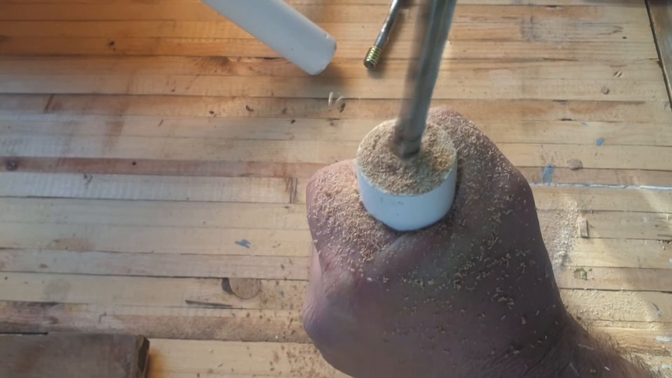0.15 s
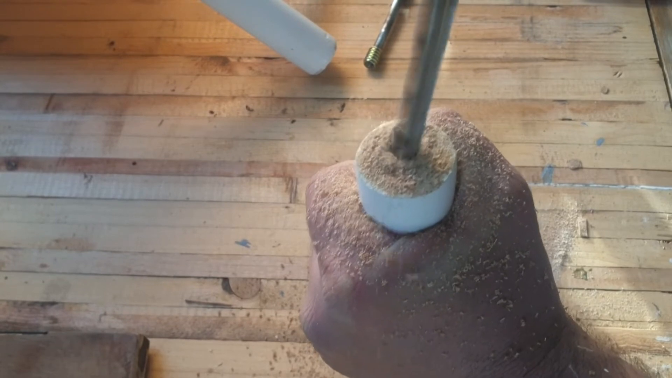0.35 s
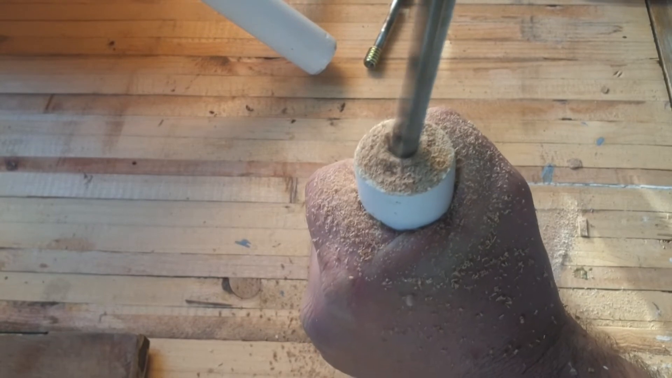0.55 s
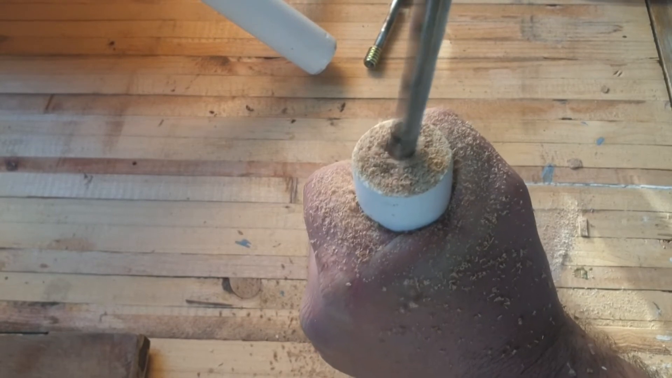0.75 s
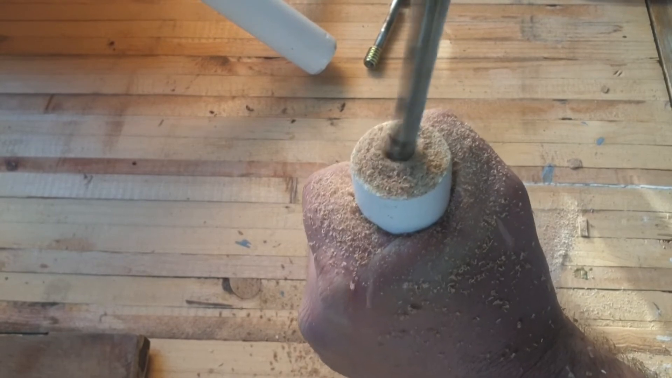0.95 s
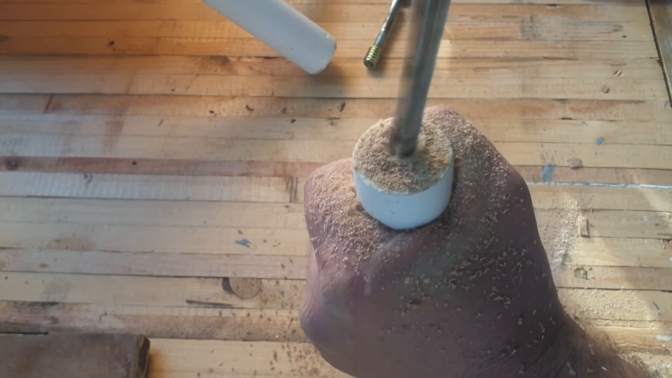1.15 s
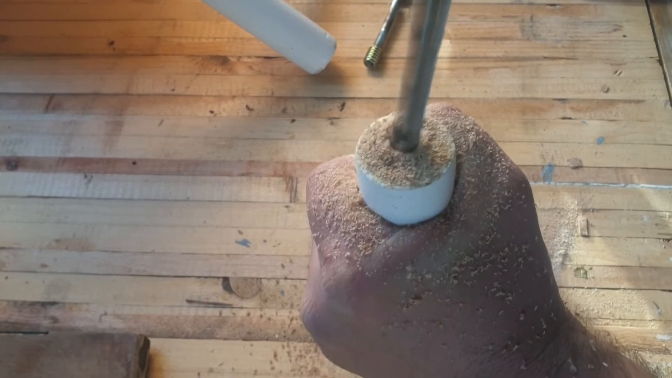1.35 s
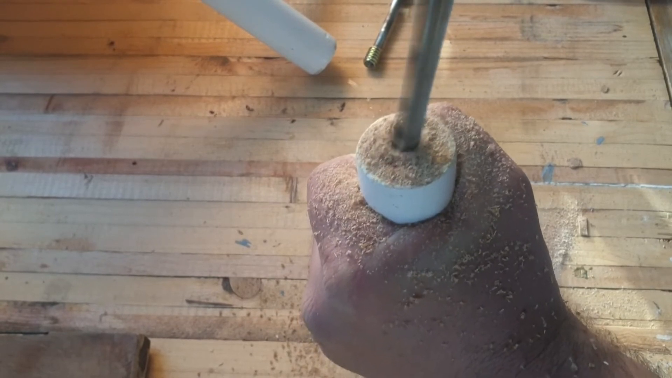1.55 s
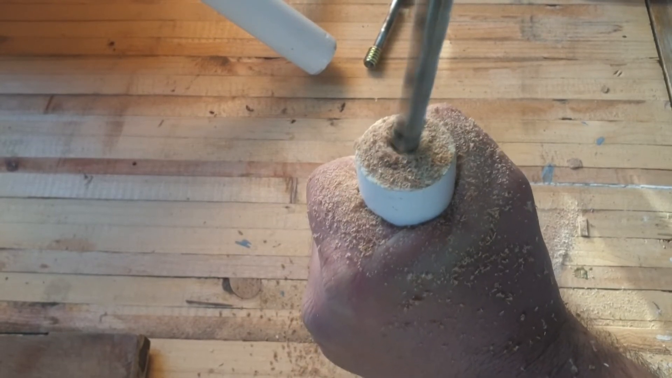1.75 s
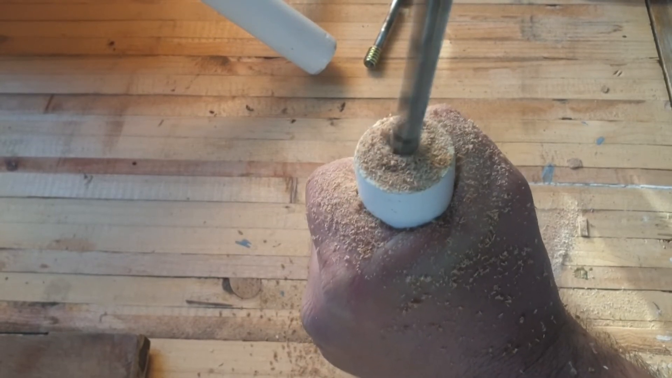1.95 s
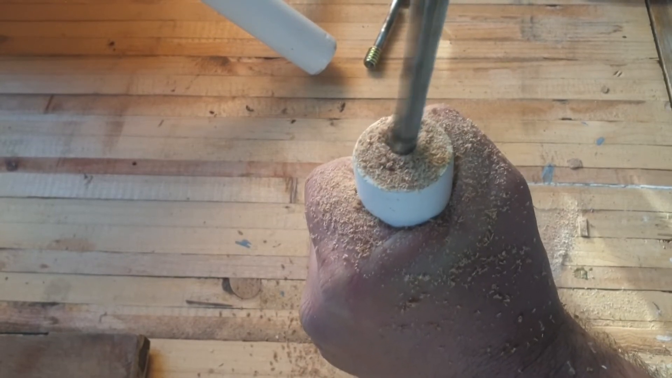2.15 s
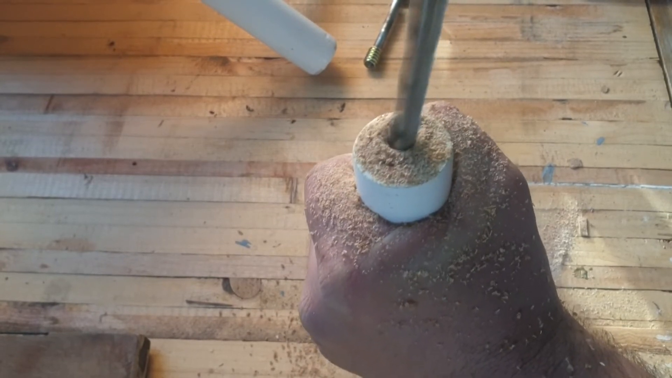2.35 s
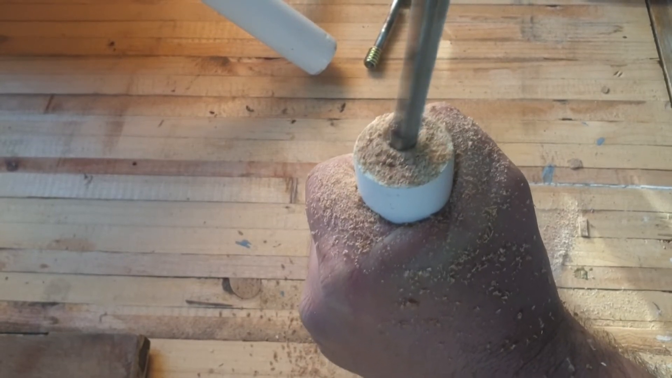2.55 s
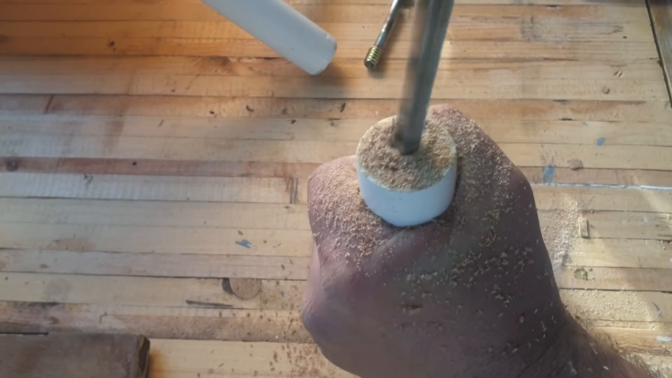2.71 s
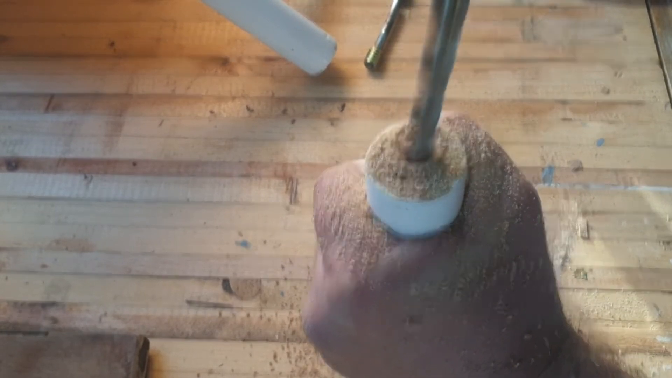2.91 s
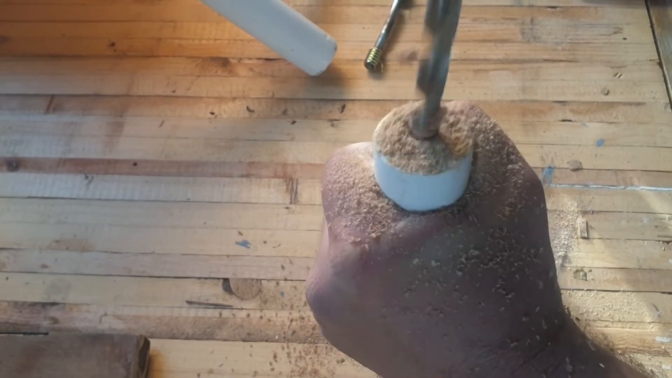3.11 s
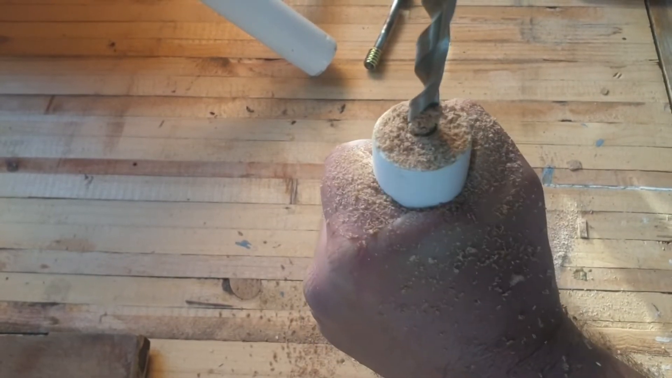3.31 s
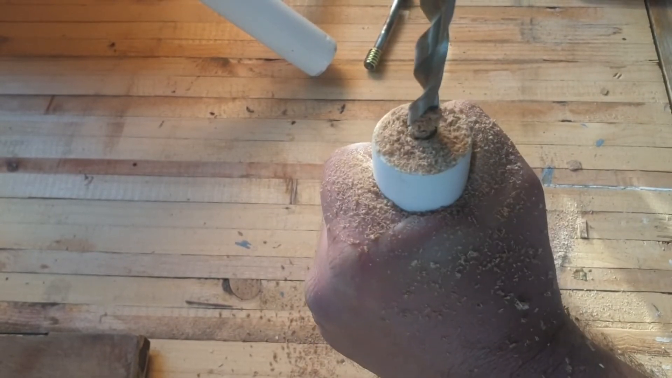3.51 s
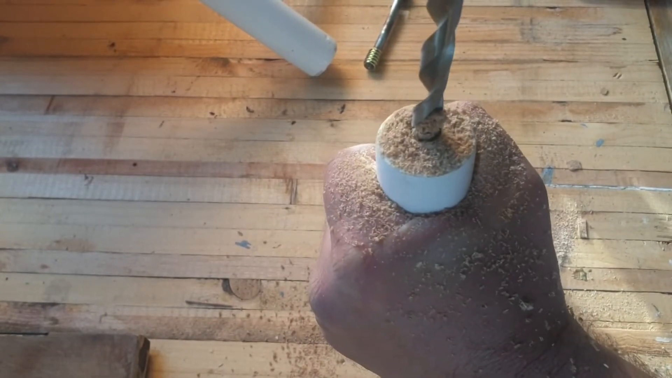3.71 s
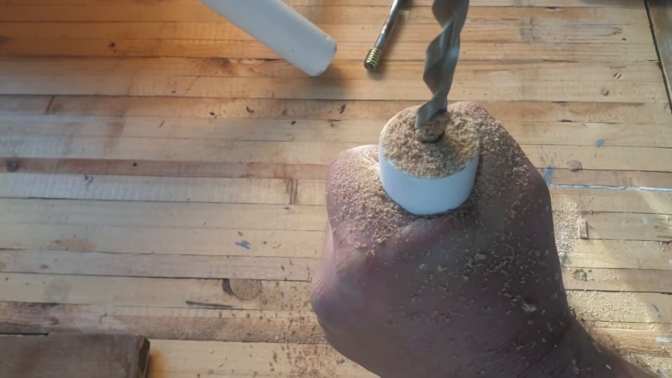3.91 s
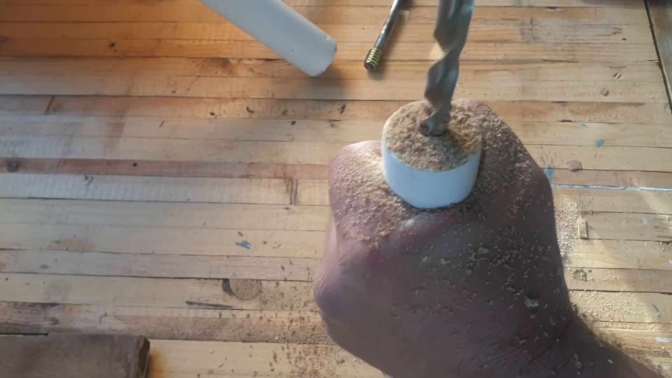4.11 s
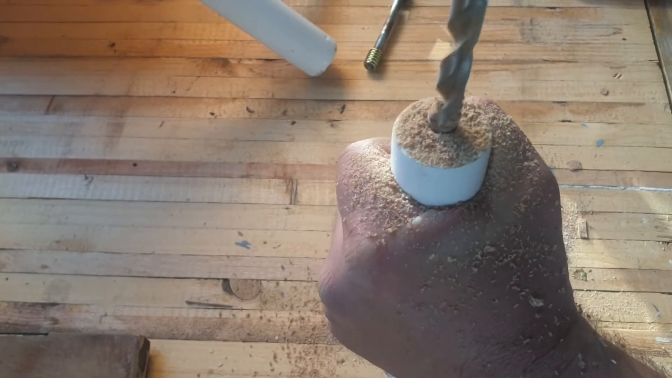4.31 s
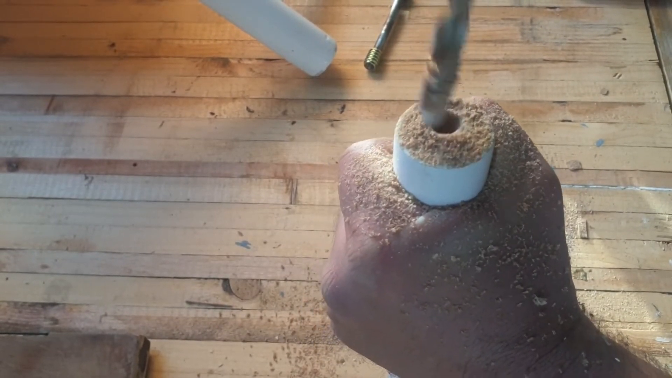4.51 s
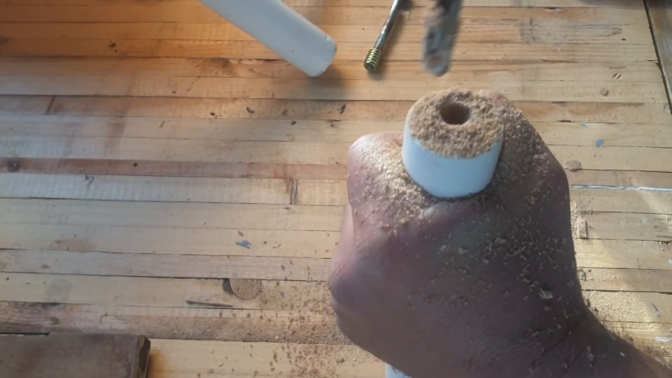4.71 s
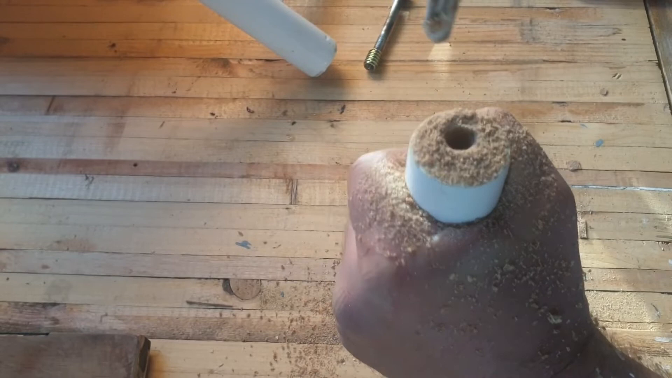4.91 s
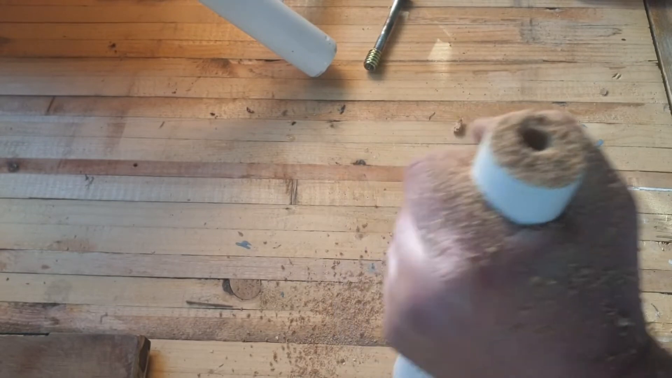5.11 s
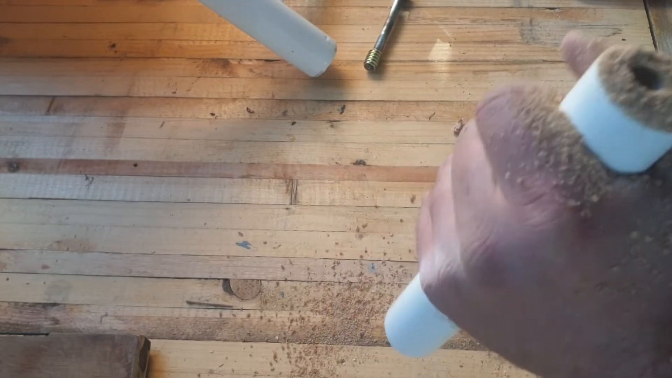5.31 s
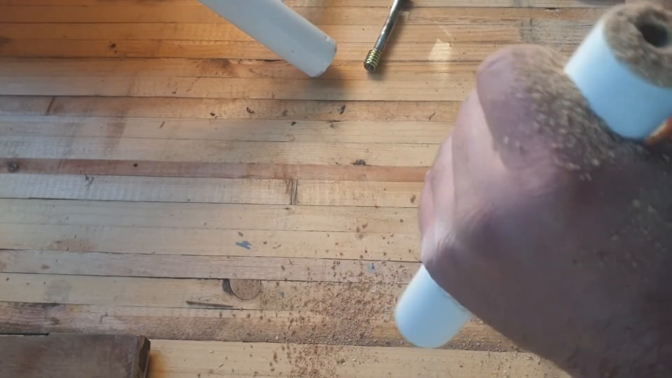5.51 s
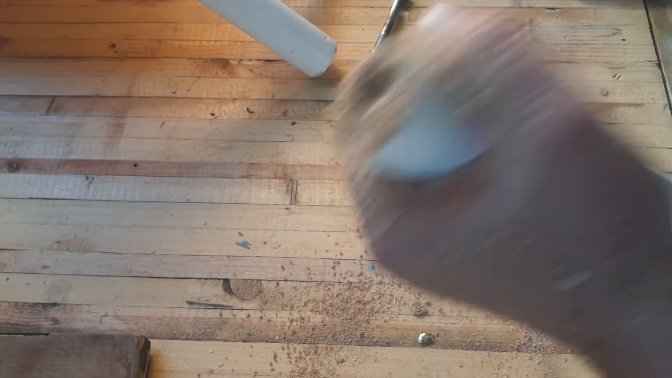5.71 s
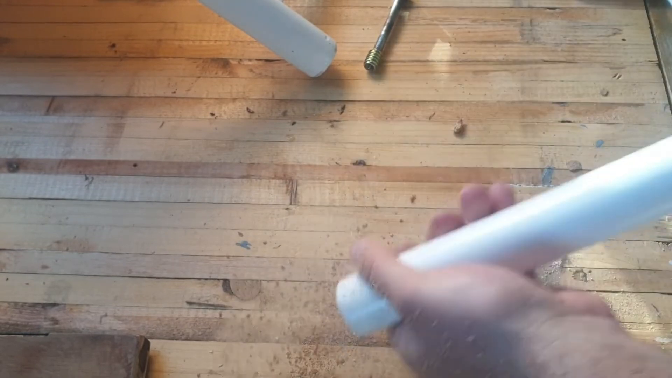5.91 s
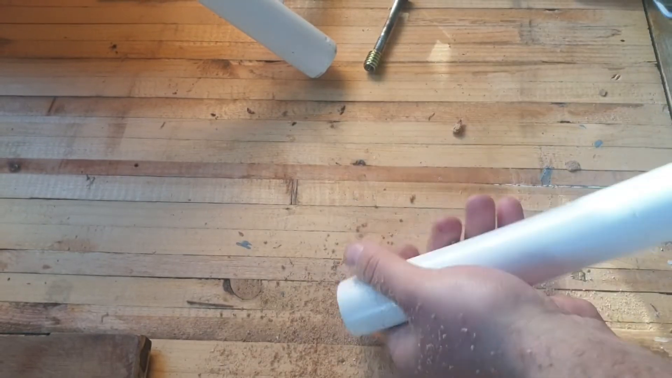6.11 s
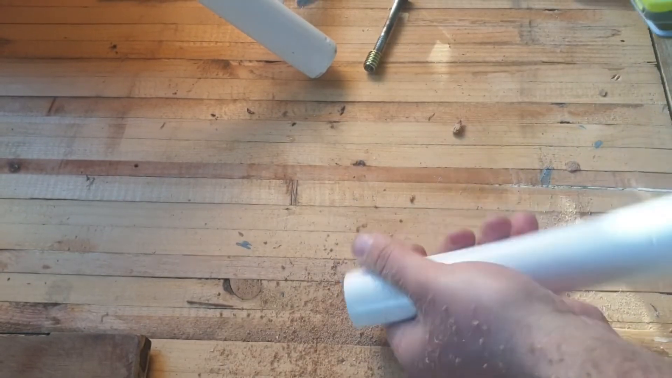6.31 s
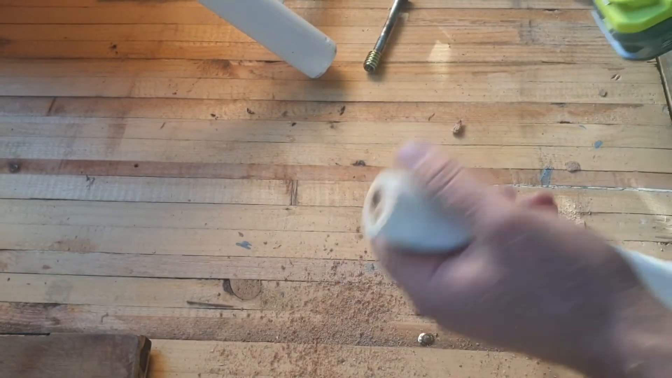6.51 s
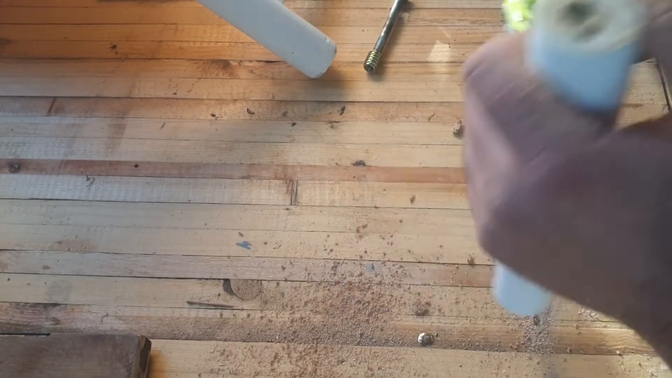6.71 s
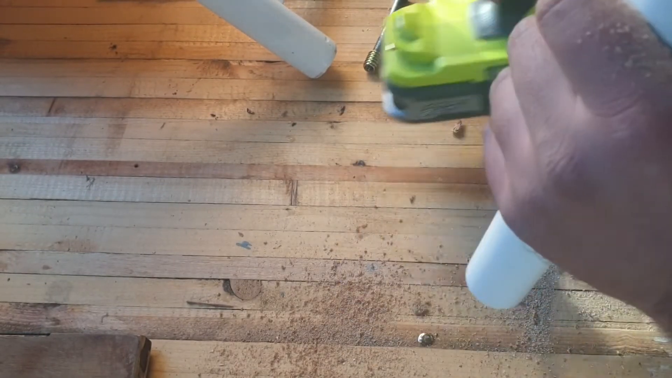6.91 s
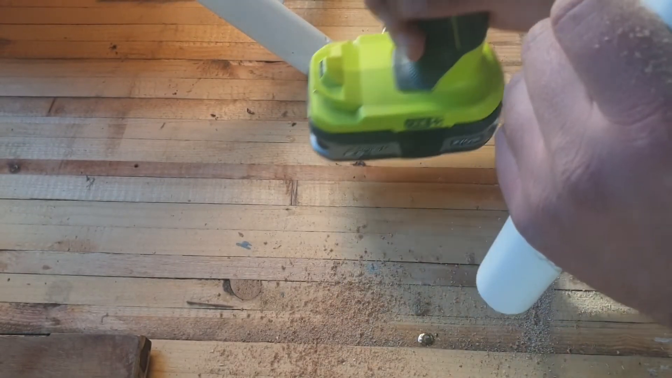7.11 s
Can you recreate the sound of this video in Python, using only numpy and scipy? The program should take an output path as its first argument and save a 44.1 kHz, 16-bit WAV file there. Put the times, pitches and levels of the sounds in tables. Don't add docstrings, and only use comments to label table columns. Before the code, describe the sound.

Close up in a small workshop, a cordless drill bores with a steady harsh geared rush and low shudder. Pulling out, it scrapes, snaps and thuds, then brakes abruptly. After a quiet gap come two short trigger squeezes with a thin high whistle and clicks. Dust pours from a tube, two hollow knocks land on the bench, a battery drags aside, and a distant engine drone swells.

```python
import sys
import numpy as np
from scipy import signal
from scipy.fft import rfft, irfft
from scipy.io import wavfile
from scipy.ndimage import uniform_filter1d

SR = 44100
rng = np.random.default_rng(int(sys.argv[2]) if len(sys.argv) > 2 else 0)


def to_linear_factor(level_db):
    exponent = np.asarray(level_db, float) / 20
    return 10 ** exponent


def persist_wave(psi):
    counts = np.round(np.clip(psi, -1, 1) * 32767).astype(np.int16)
    wavfile.write(sys.argv[1], SR, np.atleast_2d(counts).T)


N = 315314
TIME = np.arange(N) / SR
BINS = np.maximum(np.fft.rfftfreq(N, 1 / SR), 1)
SNAG_S = 2.868

# (time [s], share of full speed [0-1])
SPEED = [
    (0, 1),
    (2.7, 1),
    (2.8, .985),
    (2.95, .97),
    (3.03, .93),
    (3.12, .6),
    (3.2, .3),
]
# (pull [s], release [s], brake [s], gear noise [dB], whistle [dB])
SQUEEZES = [
    (3.882, 4.033, 4.091, -37.5, -33),
    (4.2599, 4.425, 4.633, -36, -29),
]


def rms_one(x):
    return x / np.sqrt(np.mean(x ** 2) + 1e-20)


def in_time(rows):
    s, *columns = np.transpose(rows)
    return [np.interp(TIME, s, c) for c in columns]


def while_on(rows):
    edge_s = .004
    inside = np.minimum(TIME - rows[0][0] + edge_s, rows[-1][0] - TIME + edge_s)
    return np.clip(inside / edge_s, 0, 1)


def at_hz(points, column=1):
    points = np.array(points)
    return np.interp(np.log(np.minimum(BINS, 15000)), np.log(points[:, 0]), points[:, column])


def lifted(spectrum, peaks):
    lift_db = sum(db / (1 + (2 * (BINS - hz) / width) ** 2) for hz, width, db in peaks)
    return to_linear_factor(at_hz(spectrum) + lift_db)


def band(x, lo_hz, hi_hz):
    return signal.sosfilt(signal.butter(2, [lo_hz, hi_hz], "band", fs=SR, output="sos"), x)


def drift(rate):
    r = np.exp(-80 * np.pi * rate / SR)
    slow = signal.lfilter([1], [1, -2 * r, r * r], rng.standard_normal(N // 40 + 2002))[2000:]
    return np.interp(np.arange(N) / 40, np.arange(len(slow)), rms_one(slow))


def ring(hits, hz, t60):
    r, w = to_linear_factor(-60 / (t60 * SR)), 2 * np.pi * hz / SR
    return signal.lfilter([0, np.sin(w)], [1, -2 * r * np.cos(w), r * r], hits + 1e-18)


def tilted(left_right_db):
    return to_linear_factor([[left_right_db / 2], [-left_right_db / 2]])


def port_noise(gain, lo_hz, hi_hz, grain_db, behind):
    # (frequency [Hz], share [0-1])
    shared_share = [(60, .9), (150, .8), (400, .5), (900, .6), (1600, .55), (2500, .4), (4000, .35),
                    (5500, .5), (6400, .82), (7500, .8), (8200, .3), (16000, .15)]
    grains = to_linear_factor(grain_db * rng.standard_normal((3, N)))
    shared, left, right = rfft(rng.standard_normal((3, N)) * grains)
    alike = at_hz(shared_share)
    late = np.exp(-1j * behind) + 0 * BINS
    together = np.sqrt(alike) * shared * [late ** 0, late]
    apart = np.sqrt(1 - alike) * np.array([left, right])
    pair = gain * (together + apart)
    inside = np.abs(pair.mean(axis=0)[(BINS > lo_hz) & (BINS < hi_hz)]) ** 2
    return irfft(pair, N) * N / np.sqrt(2 * inside.sum())


def at_ports(x, lag_s):
    return np.array([x, np.interp(TIME - lag_s, TIME, x)])


def falling(at_s, fast_db_per_s, step_db, echo_db_per_s):
    since = np.maximum(TIME - at_s, 0)
    return -np.minimum(fast_db_per_s * since, step_db + echo_db_per_s * since)


def blend(parts):
    power = np.array([to_linear_factor(2 * db) + 1e-30 for db, _ in parts])
    share = sum(p * bright_db for p, (_, bright_db) in zip(power, parts)) / power.sum(axis=0)
    return 10 * np.log10(power.sum(axis=0)), share


def gears(level_db, bright_db, colour, peaks, split_hz, lag_share, patchy_db, top_db, ripple_db=1.5):
    # (frequency [Hz], phase [rad])
    port_phase = [(0, -3), (780, 1), (1720, 0.82), (2150, 0.5), (2840, 2.5), (3530, 2.5), (4910, 7),
                  (5600, 7), (5860, 7.5), (6720, 8.5), (7150, 8), (7410, 7.5), (7670, 7), (15600, 6.5)]
    width = max(int(30 * N / SR), 1)
    ripple = rng.standard_normal(len(BINS))
    ripple = rms_one(uniform_filter1d(uniform_filter1d(ripple, width), width))
    gain = lifted(colour, peaks) * to_linear_factor(ripple_db * ripple)
    dull_part = 1 / (1 + (BINS / 4250) ** 8)
    behind = lag_share * np.interp(BINS, *np.transpose(port_phase))

    together = 1.3 * drift(34) + 0.46 * drift(90)
    dull = port_noise(gain * np.sqrt(dull_part), 900, 4000, 5.0, behind)
    dull = dull * to_linear_factor(patchy_db * (.5 * together + 0.57 * drift(40)))
    bright = port_noise(gain * np.sqrt(1 - dull_part), split_hz, 16000, 2.5, behind)
    bright = bright * to_linear_factor(patchy_db * (.6 * together + .6 * drift(150)))
    bright = bright + band(bright, 9000, 15900) * (to_linear_factor(top_db) - 1)
    return to_linear_factor(level_db) * (dull + to_linear_factor(bright_db) * bright)


def run_controls():
    # (time [s], level [dB])
    feed = [
        (0, -42),
        (.3, -41),
        (.9, -40.5),
        (2.1, -44),
        (2.66, -42),
        (2.8, -58),
        (2.88, -47),
        (3.01, -50),
        (3.1, -52),
    ]
    pull_s, free_s, scrape_db = 2.69, 3.03, 11
    snag_rise_s, snag_fall_s, snag_db, snag_rattle_db = 0.015, 0.068, 8.5, 2
    brake_s, low_fall_share = 3.097, 0.4
    run_db, sag_db_per_s, speed_power = -28.5, 0.21, 2.2

    snag = np.exp(-np.maximum((SNAG_S - TIME) / snag_rise_s, (TIME - SNAG_S) / snag_fall_s))
    scrape = np.clip(np.minimum(TIME - pull_s, free_s - TIME) / .02, 0, 1)
    stop_db = falling(brake_s, 780, 13, 316)
    speed_db = 20 * np.log10(np.interp(np.minimum(TIME, brake_s), *np.transpose(SPEED)))
    gear_db = run_db - sag_db_per_s * TIME + speed_power * speed_db + snag_rattle_db * snag + stop_db
    shudder_db = -46.5 + scrape_db * scrape + snag_db * snag + low_fall_share * stop_db
    bright_db = 8 - 3.5 * np.clip((TIME - brake_s) / .012, 0, 1)
    bite_db = in_time(feed)[0] + low_fall_share * stop_db
    return gear_db, bright_db, shudder_db, bite_db


def drilling():
    # (frequency [Hz], density [dB per Hz])
    run_colour = [(180, -45.5), (300, -25.5), (528, -23), (773, -16), (928, -10.5), (1110, -15),
                  (1430, -9.5), (1630, -12.5), (2970, -11), (5480, -7), (7030, 3), (8880, -18),
                  (12000, -11), (14900, -14.5), (15900, -18)]
    shudder_colour = [(24, -39.5), (40, -12.5), (81, -1), (194, -7.5), (333, -8), (389, -7.5), (700, -22),
                      (910, -43.5), (1540, -120)]
    # (frequency [Hz], width [Hz], lift [dB])
    housing = [(999, 40, 1.5), (1400, 190, 2.5), (1538, 14, 2), (1655, 65, -2), (1793, 40, 5.5),
               (1960, 50, 4), (2184, 35, 4), (2246, 34, 1), (2430, 130, -3.5), (2600, 120, 5.5),
               (2950, 140, 1), (3150, 90, 3.5), (3480, 40, 1.5),
               (4240, 71, -2), (4405, 60, 4.5), (4500, 60, -1.5), (4710, 160, 4), (5250, 60, -2),
                 (6260, 54, -6), (6060, 50, 3), (6330, 120, 2), (6450, 70, -1), (6560, 200, 1.5),
                 (6810, 110, -3), (7000, 300, 3.5), (7400, 300, -1.5), (7850, 60, 2.5)]
    # (multiple [1], level [dB])
    bite_orders = [(1, -11), (2, 0.5), (3, -20.5), (4, -17), (5, -13), (6, -14), (5.5, -23.5), (7.5, -18.5),
                   (14.3, -19.5)]
    whine_hz = [166.9, 311.2, 333.8, 621.6, 813.9, 931.7, 1242, 1467, 1554, 1730, 2597, 3173, 3729, 5194,
                6346]
    # (level [dB], lag of the right port [rad])
    whine_tones = [(-62.5, .2), (-53, 2), (-60, 0.24), (-52, 2), (-53, 2.9), (-46.5, 0.5), (-55, .6),
                   (-51.5, 0.57), (-58.5, 2.4), (-44.5, 1.5), (-56.5, 0.58), (-47, 2.2), (-47.5, 2),
                   (-47, 1.4), (-40, 0.82)]
    bite_hz = 48.3
    lip_beat_db, rotor_beat_db, top_flutter_db = .35, .65, 1.0

    level_db, bright_db, shudder_db, bite_db = run_controls()
    speed = in_time(SPEED)[0] * (1 + .001 * drift(1.5))
    turned = 2 * np.pi * np.cumsum(speed) / SR
    lip = np.sin(bite_hz * turned)

    bite = 0
    for k, db in bite_orders:
        wobble_db = 0.45 * np.sqrt(k) * drift(7.8)
        bite = bite + to_linear_factor(db + wobble_db) * np.sin(k * bite_hz * turned + rng.uniform(0, 7.7))
    whine = 0
    for hz, (db, behind) in zip(whine_hz, whine_tones):
        phase = hz * turned + .5 * drift(hz / 300) - np.array([[0], [behind]])
        whine = whine + to_linear_factor(db + 2.0 * drift(6)) * np.sin(phase)
    tones = np.sqrt(2) * (to_linear_factor(bite_db) * at_ports(bite, 0.00057) + to_linear_factor(level_db + 31.5) * whine)

    throb = 1 + 0.17 * lip
    shudder = port_noise(to_linear_factor(at_hz(shudder_colour)), 110, 450, 0, 0) * throb * tilted(-2.6)
    shudder = to_linear_factor(shudder_db - 7.5 + 2.3 * drift(22)) * shudder

    rotor = np.sin(whine_hz[1] * turned) + .7 * np.sin(2 * whine_hz[1] * turned)
    top_db = top_flutter_db * drift(15) + rotor_beat_db * rotor
    noise = gears(level_db, bright_db, run_colour, housing, 4500, 1, patchy_db=0.47,
                  top_db=top_db, ripple_db=.6)
    noise = noise * to_linear_factor(lip_beat_db * lip + 0.48 * rotor_beat_db * rotor)
    return (noise + tones + shudder) * tilted(.8)


def thud():
    jolt = np.exp(-((TIME - SNAG_S + 0.0034) / 0.0017) ** 2)
    return to_linear_factor(-28.5) * ring(jolt / jolt.sum(), hz=82, t60=.12)


def spin_controls():
    # (time [s], level [dB], bright share [dB])
    jerks = [
        (3.892, -50, -5),
        (4.114, -57, -27),
        (4.642, -42, -7.5),
        (4.686, -61, -7),
    ]
    jerk_rise_db_per_s, jerk_fall_db_per_s = 1900.5, 1500
    spin_lag_s, spin_up_s, spin_power, sag_db_per_s = 0.015, 0.0095, 4.2, 15.5
    coast_db, coast_s, bright_start_db, dulling_db_per_s = 5, 0.027, -7, 10.5
    last_turn_s, last_turn_db = .03, 4
    echo_bright_db = -15

    parts = []
    for pull_s, release_s, brake_s, gear_db, _ in SQUEEZES:
        turning = np.maximum(TIME - pull_s - spin_lag_s, 0)
        coasting = np.clip(TIME - release_s, 0, brake_s - release_s)
        up_db = spin_power * 20 * np.log10(1 - np.exp(-turning / spin_up_s) + 1e-9)
        held_db = up_db - sag_db_per_s * turning - coast_db * (1 - np.exp(-coasting / coast_s))
        held_db = held_db - last_turn_db * np.exp(-np.abs(TIME - brake_s) / last_turn_s)
        spin_bright_db = bright_start_db - dulling_db_per_s * coasting
        bright_db = np.where(TIME < brake_s + .02, spin_bright_db, echo_bright_db)
        parts.append((gear_db + held_db + falling(brake_s, 1600, 19, 220), bright_db))
    for s, db, bright_db in jerks:
        away_db = np.maximum(jerk_rise_db_per_s * (s - TIME), jerk_fall_db_per_s * (TIME - s))
        parts.append((db - away_db, bright_db))
    return blend(parts)


def freewheeling():
    crossover_s = 0.027
    return sum(np.clip((TIME - release_s) / crossover_s, 0, 1) * (TIME < brake_s + .1)
               for _, release_s, brake_s, _, _ in SQUEEZES)


def whistle(pull_s, release_s, sing_db):
    stall_s, stall_hz, stall_db = 0.018, 6830, -9.5
    sing_hz, dip_hz, dip_s, droop_max_hz, droop_s = 6767, 287, 0.0097, 95, 0.0264
    rise_s, edge_db_per_s, switch_on_sharper, octave_db = 0.0041, 4000, 2.8, -29

    free = np.maximum(TIME - pull_s - stall_s, 0)
    droop_hz = droop_max_hz * np.exp(np.minimum(TIME - release_s, 0) / droop_s)
    hz = np.where(free > 0, sing_hz - dip_hz * np.exp(-free / dip_s) - droop_hz, stall_hz)
    before_on = switch_on_sharper * (pull_s + 0.0013 - TIME)
    off = np.maximum(np.maximum(before_on, TIME - release_s + 0.007), 0)
    db = sing_db + stall_db * np.exp(-free / rise_s) - edge_db_per_s * off
    phase = 2 * np.pi * np.cumsum(hz) / SR
    sing = np.sin(phase) + to_linear_factor(octave_db) * np.sin(2 * phase)
    return np.sqrt(2) * to_linear_factor(db + 0.76 * drift(40)) * sing * tilted(5)


def squeezes():
    # (frequency [Hz], density [dB per Hz])
    driven_colour = [(150, -24), (250, -11), (342, -9), (747, -14), (952, -4.5), (1470, -7), (1600, -6),
                     (1840, -4), (2700, -1), (3270, -6), (5040, -13), (6780, 0), (8790, -24.5),
                     (12700, -17.5), (15900, -22.5)]
    coast_colour = [(150, -56), (250, -10.5), (518, -12), (628, -24), (952, -3), (5040, -15.5), (6780, -3),
                    (8790, -24.5), (15900, -18.5)]
    # (frequency [Hz], width [Hz], lift [dB])
    slow_peaks = [(1400, 190, 11.5), (1834, 130, 9.5), (2730, 220, 0), (4680, 1100, 6.5), (5800, 200, 4.5),
                  (6040, 1100, -5.5)]
    loose_peaks = [(5600, 270, 4.9), (2650, 700, 5.0), (4020, 900, 1.0)]

    level_db, bright_db = spin_controls()
    driven = gears(level_db, bright_db, driven_colour, slow_peaks, 7140, 0, patchy_db=1.0,
                   top_db=1.5 * drift(60))
    loose = gears(level_db, bright_db, coast_colour, loose_peaks, 7210, 0, patchy_db=0.3,
                  top_db=2.0 + 2.9 * drift(140))
    loose_share = freewheeling()
    out = (np.sqrt(1 - loose_share) * driven + np.sqrt(loose_share) * loose) * tilted(1)
    for pull_s, release_s, _, _, sing_db in SQUEEZES:
        out = out + whistle(pull_s, release_s, sing_db)
    return out


def snaps():
    # (time [s], peak [dB], ring [Hz], t60 [s], left-right [dB])
    catches = [(2.8045, -12, 7000, 0.011, 2), (2.9337, -8, 7000, 0.019, 5), (2.9495, -13, 7000, .02, 2),
               (2.9535, -15, 7000, .015, 2), (3.0718, -25, 6900, .012, 4), (4.6352, -34.5, 6280, .015, 0),
               (4.638, -31.5, 6800, 0.011, -5), (4.6403, -33.5, 7000, 0.011, 2), (4.641, -38, 3100, .01, 2),
               (4.6425, -44, 1300, .012, 2), (4.6790, -43, 6900, .008, 2), (4.682, -46, 4300, 0.011, 2),
               (4.687, -47, 6900, .01, 2), (3.8685, -50, 6700, 0.009, 2), (4.2475, -46, 6900, .008, 0),
               (5.5950, -43.5, 4500, 0.0012, -12), (5.5957, -49, 7400, 0.0052, -12),
               (5.8112, -54.5, 7500, .002, -8)]
    partner, partner_db = .93, -5
    out = np.zeros((2, N))
    for s, db, hz, t60, pan_db in catches:
        touch = np.zeros(SR // 10)
        touch[0] = to_linear_factor(db - 3)
        rung = ring(touch, hz, t60) + to_linear_factor(partner_db) * ring(touch, partner * hz, t60)
        at = round(s * SR)
        out[:, at:at + len(touch)] += rung * tilted(pan_db)
    return out


def clicks():
    # (time [s], peak [dB], ring [Hz], ring share [dB], left-right [dB])
    click_hits = [(3.164, -40.5, 1500, -19, -2), (3.6465, -59, 1200, -10, -3), (3.8695, -50, 1300, -8, 0),
                  (4.1255, -59, 2500, -9, 2), (4.2475, -48, 1500, -12, 1), (4.2588, -46, 1510, -15, -4),
                  (3.6425, -48, 910, -16.5, -6), (3.8494, -57, 1470, -2, -2.5),
                  (3.8642, -41, 1500, -16, -13), (3.8671, -50.5, 1400, -8, 0.0),
                  (3.8784, -48, 1460, -24, 6.5), (3.889, -34, 1370, -18, 15), (4.091, -48, 1810, -10, -3),
                  (4.11, -53, 1380, 10, 0), (4.1155, -58, 1380, 3, -6), (4.1945, -68, 1500, 1.5, -2),
                  (4.213, -46, 1440, -1, -7), (4.243, -34, 1500, -18, 12), (4.624, -45, 922, -7, 1.0),
                  (4.648, -48, 2610, -14, 0.5), (4.6395, -39, 908, -12, 2), (4.678, -37, 2600, -21, 0.5),
                  (4.6856, -38, 2320, -12, 1.0), (5.597, -57, 923, -32, -24), (5.8117, -44, 807, -16, -11),
                  (5.8341, -56, 1330, -21, -8.5), (6.6385, -62, 2730, 3, -8),
                  (6.7355, -57, 1005, -12, -9.5)]
    decay_s, ring_t60_s, top_db = .0018, .009, -23
    out, length = np.zeros((2, N)), 1500
    rattle = rng.standard_normal((len(click_hits), length)) * np.exp(-np.arange(length) / (decay_s * SR))
    for (s, peak_db, hz, ring_db, pan_db), burst in zip(click_hits, rattle):
        body = ring(burst, hz, ring_t60_s) + 0.44 * ring(burst, 0.74 * hz, ring_t60_s)
        body = band(to_linear_factor(ring_db - 7.0) * body, 670, 6000)
        dry_part = band(burst, 2100, 6200) + band(burst, 4900, 7100)
        dry_part = dry_part + to_linear_factor(top_db) * band(burst, 8500, 15000)
        at = round(s * SR)
        out[:, at:at + length] += to_linear_factor(peak_db - 5.5) * (body + dry_part) * tilted(pan_db)
    return out


def knocks():
    # (time [s], peak [dB], dust level [dB])
    blows = [
        (6.077, -20.5, 0.5),
        (6.286, -25.5, -1.5),
    ]
    # (frequency [Hz], level [dB], t60 [s])
    bench_modes = [(106.3, 2.5, 0.052), (144.7, -1, 0.059), (226, -11, 0.06), (298, 0, 0.03),
                   (340, 1, 0.039), (440, 0, 0.055), (510, -22, 0.021), (600, -7.5, 0.08), (680, -3, 0.032),
                   (754, -19, 0.03), (892, 5, 0.076), (994, -11, 0.037), (1150, -20, .02), (1600, -6, .02)]
    # (frequency [Hz], density [dB per Hz])
    debris_colour = [(880, -30), (1500, -2), (2480, -7.5), (3990, -6.5), (5470, -17.5), (7350, -3.5),
                     (8360, -25.5), (15900, -18.5)]
    rebounds = ((0, 10.9), (.004, 38), (.012, 20), (.031, 23))      # (s after, dB below)
    blow_s, debris_db, debris_s, debris_rise_s = 0.00076, -48.5, 0.018, .004
    hollow_s, hollow_db = .025, -22

    hits, shaken = np.zeros((2, N))
    for s, db, dust_db in blows:
        for after_s, less_db in rebounds:
            hits[round((s + after_s) * SR)] -= to_linear_factor(db - less_db)
        since = np.maximum(TIME - s - .002, 0)
        rise = since / debris_rise_s
        shaken += to_linear_factor(db + dust_db + debris_db) * np.e * rise / (1 + rise) * np.exp(-since / debris_s)

    push = np.hanning(round(2 * blow_s * SR))
    rung = sum(to_linear_factor(db) * ring(hits, hz, t60) for hz, db, t60 in bench_modes)
    blow = np.convolve(rung, push / push.sum())[:N]
    blow = band(blow, 104, 1700)
    hollow = np.exp(-np.arange(SR // 4) / (hollow_s * SR)) * band(rng.standard_normal(SR // 4), 250, 1200)
    blow = blow + to_linear_factor(hollow_db) * signal.fftconvolve(hits, hollow)[:N]
    debris = shaken * port_noise(to_linear_factor(at_hz(debris_colour)), 2060, 7500, 6.6, -.0023 * BINS)
    return at_ports(blow, -0.00027) * tilted(-3) + debris


def sliding():
    # (time [s], level [dB])
    pour = [(5.25, -102), (5.5, -88.5), (5.64, -84), (5.74, -80.5), (5.805, -74), (5.825, -70),
            (5.855, -67.5), (5.9, -69.5), (5.955, -70.5), (5.985, -76.5), (6.06, -85), (6.15, -87.5),
            (6.43, -100), (6.63, -89)]
    drag = [
        (6.645, -86),
        (6.69, -79),
        (6.74, -76),
        (6.8, -74),
        (6.86, -74.5),
        (6.91, -77.5),
        (6.96, -80),
        (7.0, -87),
        (7.03, -99),
    ]
    # (frequency [Hz], density [dB per Hz])
    slide_colours = [
        [(240, -33), (400, 3.5), (446, -2), (752, -14.5), (1530, -11.5), (1750, -29), (2180, -21.5), (2780, -25), (3910, -9), (5400, -29.5), (6800, -16), (9120, -33), (14700, -30.5), (15900, -39)],
        [(530, -39.5), (900, -8.5), (1700, -10), (1920, -6.5), (2410, -17), (3140, -2.5), (3890, -0.5), (5010, -20), (6930, -10), (7720, -12), (8600, -34), (11800, -32), (15900, -35)],
    ]
    # (frequency [Hz], width [Hz], lift [dB])
    slide_peaks = [
        [(3950, 300, 1.5), (3276, 500, 2), (4600, 530, 4), (1300, 300, -2)],
        [(3200, 299, 4), (3910, 300, 4.5), (1900, 120, 4)],
    ]
    fine_shares_db, fine_slopes = (-2.5, -9), (-0.33, .4)

    out, coarse_part = 0, 1 / (1 + (BINS / 5300) ** 12)
    layers = zip((pour, drag), slide_colours, slide_peaks, fine_shares_db, fine_slopes)
    for rows, colour, peaks, share_db, slope in layers:
        level_db, = in_time(rows)
        fine_db = share_db + slope * (level_db + 81.0)
        coarse = port_noise(lifted(colour, peaks) * coarse_part, 3265, 4700, 5.7, -.0023 * BINS)
        fine = port_noise(to_linear_factor(at_hz(colour)) * (1 - coarse_part), 6000, 8000, 5.0, -.0023 * BINS)
        friction = coarse + to_linear_factor(fine_db) * fine
        out = out + while_on(rows) * to_linear_factor(level_db + 0.75 * drift(40)) * friction
    return out * tilted(-4.4)


def sifting():
    # (time [s], level [dB])
    settling = [
        (6.3, -94),
        (6.6, -88),
        (6.9, -85),
        (6.97, -82),
        (7.05, -86),
        (7.15, -83),
    ]
    # (frequency [Hz], density [dB per Hz])
    dust_colour = [(700, -6.5), (1500, 2), (3000, -6), (5500, -11), (7300, -5), (8600, -15), (11500, 0),
                   (15900, -4)]
    dust = port_noise(to_linear_factor(at_hz(dust_colour)), 9000, 16000, 4.0, 0)
    return to_linear_factor(in_time(settling)[0] + 1.5 * drift(30)) * while_on(settling) * dust


def background():
    # (time [s], firing rate [Hz], level [dB])
    engine = [(3.23, 53.3, -72), (3.38, 53.18, -64.5), (4.12, 53.1, -58), (4.19, 54.2, -65),
              (4.41, 53.6, -59), (4.53, 56.6, -63), (4.66, 54.2, -46.5), (4.83, 54.8, -57),
              (4.93, 54.2, -50), (5.14, 54.7, -52.5), (5.5, 54.46, -45), (5.95, 54.9, -43),
              (6.12, 55.03, -48), (6.17, 54.7, -44), (6.25, 55.67, -56), (6.39, 55.6, -41),
              (6.6, 55.8, -36), (7.12, 58.3, -32.5)]
    # (multiple of the firing rate [1], level [dB])
    drone_orders = [
        (1, -1),
        (2, -30),
        (3, -30.5),
        (4, -22.5),
    ]
    # (time [s], level [dB])
    recovery = [
        (3.26, -16),
        (3.6, -16),
        (3.8, -10.5),
        (4.8, -11),
        (5.2, -10.5),
        (5.6, -1.5),
        (6.2, 0),
        (6.5, -1.5),
        (7.15, 0),
    ]
    # (frequency [Hz], density [dB per Hz])
    air_colour = [(15, -30), (25, -7), (44, -7.5), (66, 0), (107, -14), (157, -16), (195, -20),
                  (334, -24.5), (731, -41.5), (1250, -49.5), (8300, -63.5), (12100, -54.5), (15900, -60.5)]
    # (frequency [Hz], width [Hz], lift [dB])
    room_modes = [(162, 14, 8.5), (224, 12, 6), (443, 20, 4.5)]
    # (time [s], level [dB])
    upper_rumble = [(3.25, 3.5), (3.4, -0.5), (3.7, -0.5), (3.85, -6), (4.7, -5), (5.3, -5), (5.55, 5),
                    (5.95, 5), (6.45, -3.5), (6.7, 1), (7.15, 0.5)]
    steady_db, spin_rumble_db, hiss_db, hiss_follows = -53, -19, -86, .25

    hz, drone_db = in_time(engine)
    gain_db, = in_time(recovery)
    phase = 2 * np.pi * np.cumsum(hz) / SR
    drone = sum(to_linear_factor(db + 1.5 * drift(3)) * np.sin(k * phase + rng.uniform(0, 7)) for k, db in drone_orders)
    drone = np.sqrt(2) * to_linear_factor(drone_db) * at_ports(drone, 0.00091) * tilted(-2)

    spin = np.abs(uniform_filter1d(to_linear_factor(spin_controls()[0]), size=7000))
    spin_db = spin_rumble_db + 20 * np.log10(spin + 1e-9)
    rumble_db, _ = blend([(steady_db + gain_db, 0), (spin_db, 0)])
    rumble_gain = lifted(air_colour, room_modes) / (1 + (BINS / 1300) ** 3) / (1 + (38 / BINS) ** 4)
    rumble = to_linear_factor(rumble_db) * port_noise(rumble_gain, 70, 600, 0, 0)
    rumble = rumble + band(rumble, 400, 2000) * (to_linear_factor(in_time(upper_rumble)[0]) - 1)

    hiss_gain = lifted(air_colour, [(7200, 1400, 7)]) / (1 + (1500 / BINS) ** 4)
    hiss = to_linear_factor(hiss_db + hiss_follows * gain_db) * port_noise(hiss_gain, 1500, 16000, 0, 0)
    return drone + rumble + hiss


def shop(x):
    t60_s, wet_db = 0.12, -10.5
    lag = np.arange(SR // 2) / SR
    tail = rng.standard_normal((2, len(lag))) * to_linear_factor(-60 * lag / t60_s) * (lag > .004)
    tail = signal.lfilter([1], [1, -.4], tail)
    tail = tail / np.sqrt(np.sum(tail ** 2, axis=1, keepdims=True))
    return to_linear_factor(wet_db) * signal.fftconvolve(x, tail, axes=1)[:, :N]


def scene():
    ticks = clicks() + snaps()
    blows = knocks()
    echoes = shop(to_linear_factor(0.5) * band(ticks, 2500, 9000) + blows)
    drill = drilling() + thud() + squeezes()
    return drill + ticks + blows + echoes + sliding() + sifting() + background()


def top_cut(x):
    return signal.sosfilt(signal.butter(12, 16020, fs=SR, output="sos"), x)


def record(dry):
    fade = np.clip((N / SR - TIME) / .004, 0, 1)
    return top_cut(dry * fade)


dry = scene()
out = record(dry)
persist_wave(out)
```